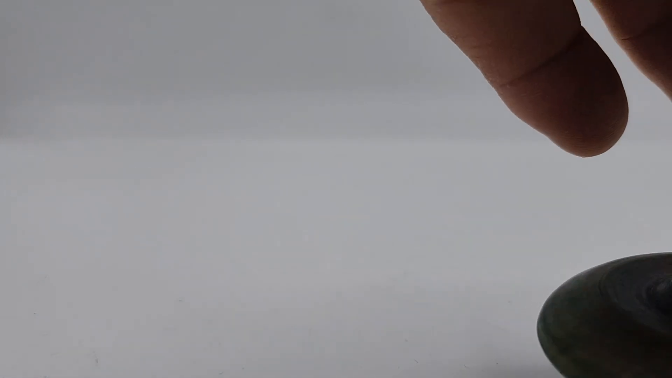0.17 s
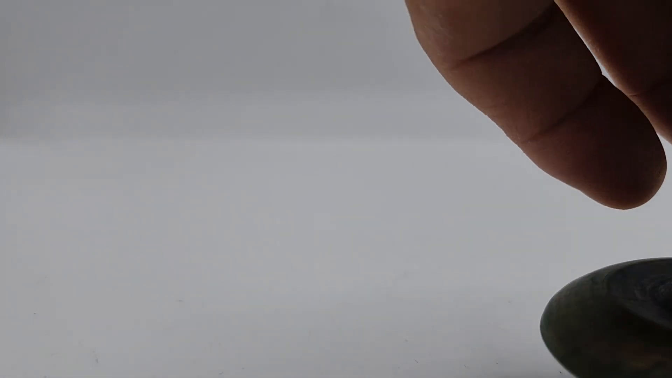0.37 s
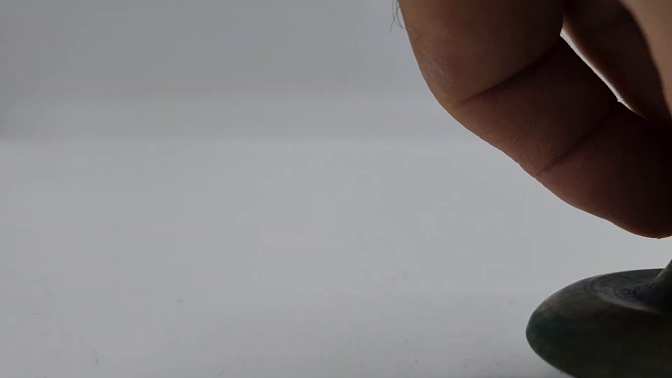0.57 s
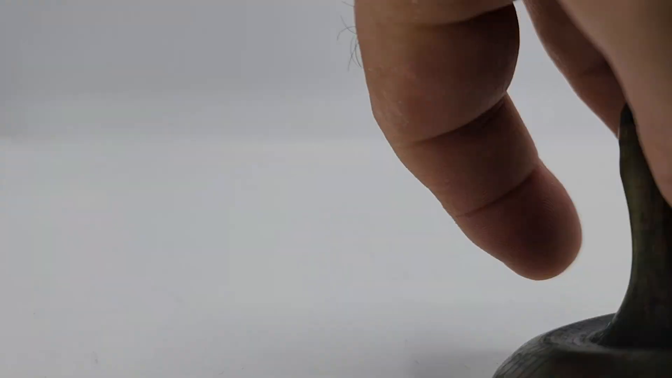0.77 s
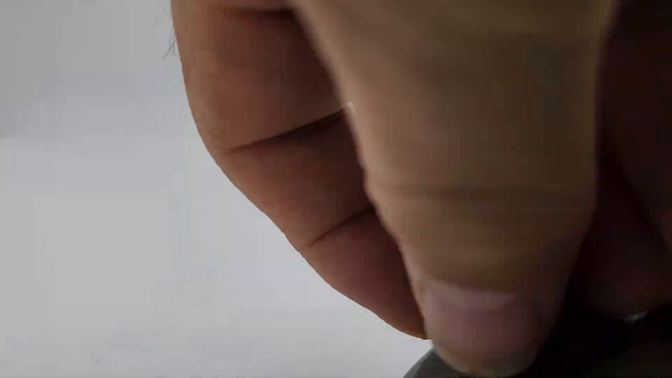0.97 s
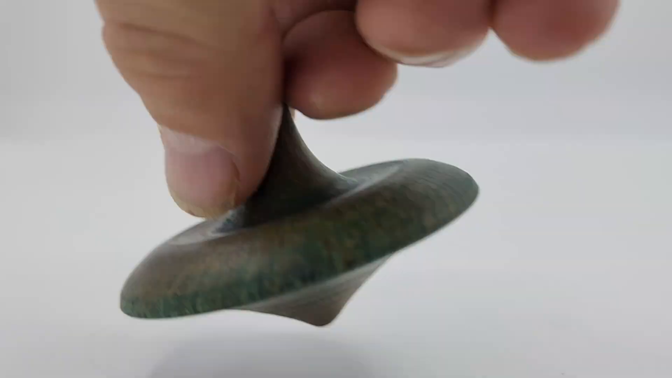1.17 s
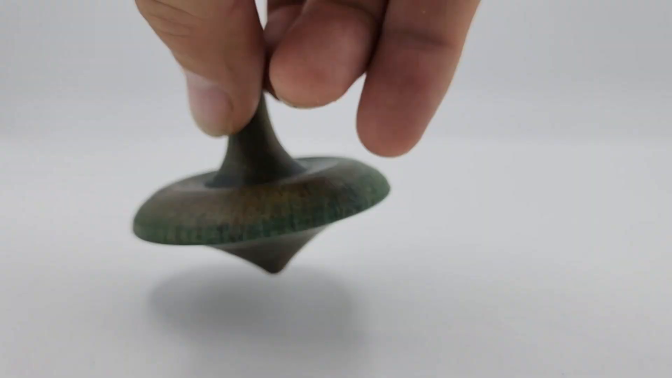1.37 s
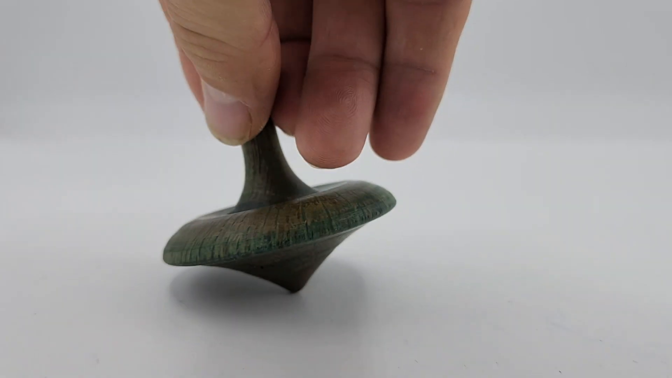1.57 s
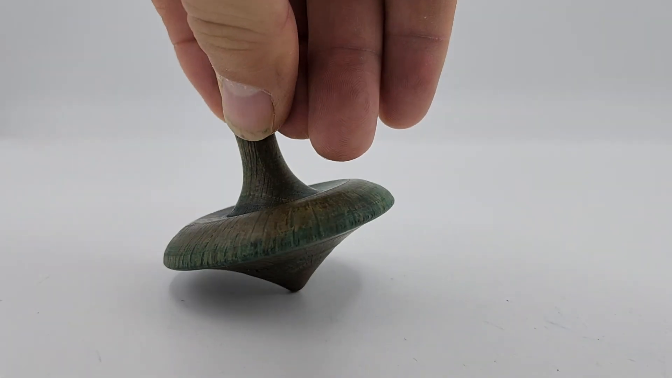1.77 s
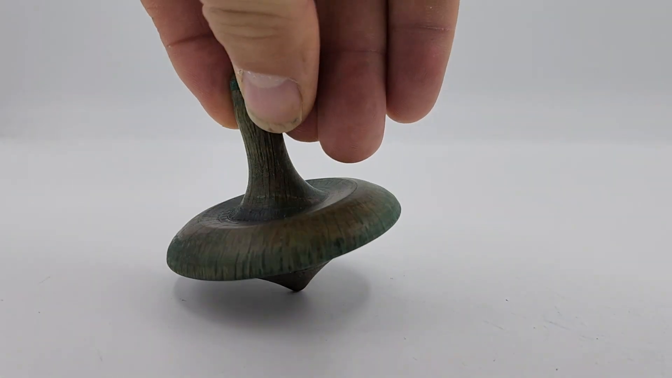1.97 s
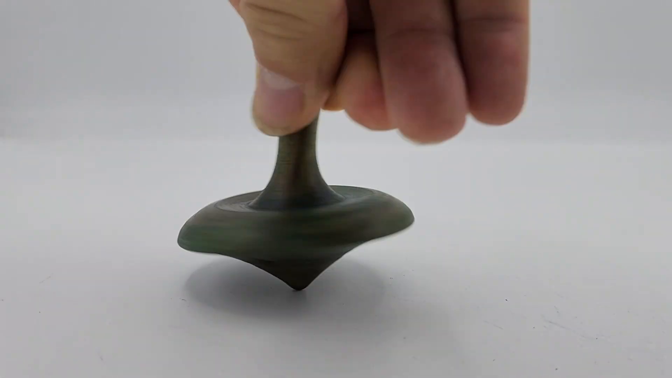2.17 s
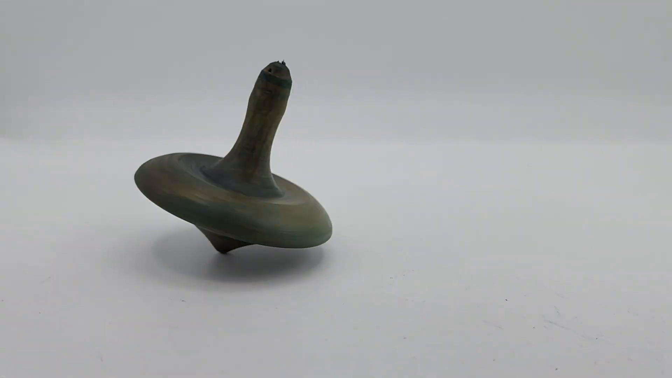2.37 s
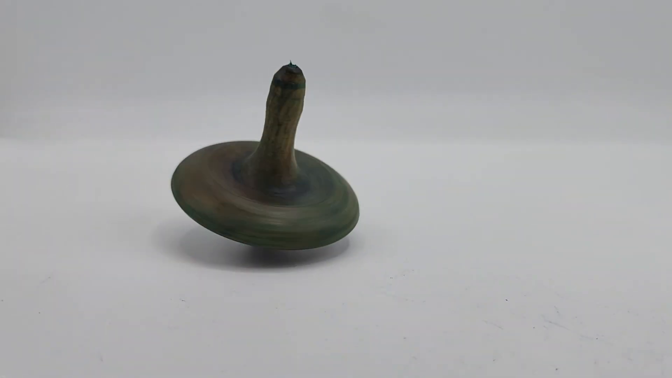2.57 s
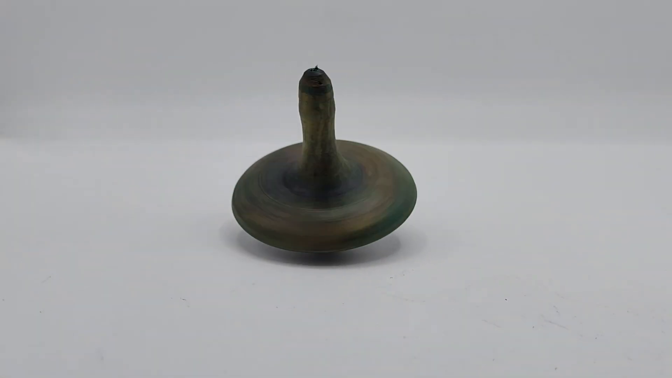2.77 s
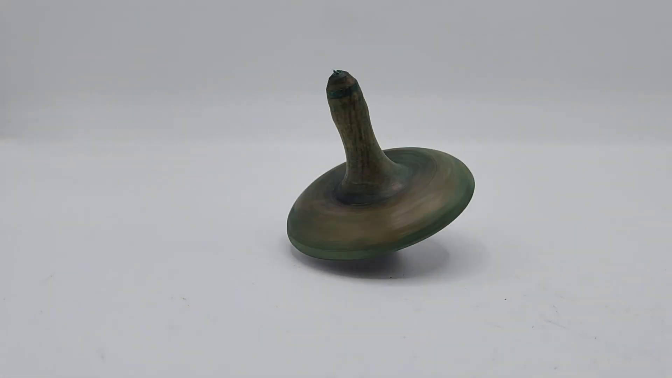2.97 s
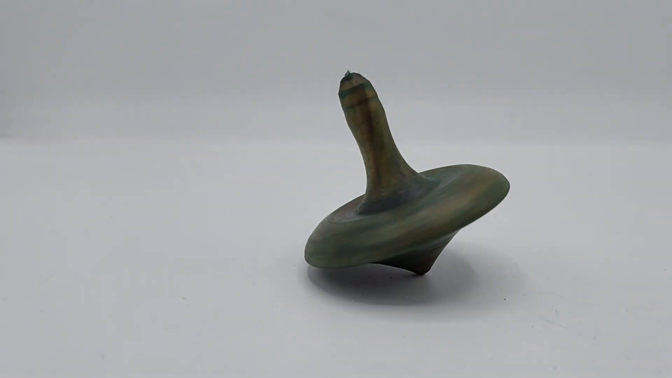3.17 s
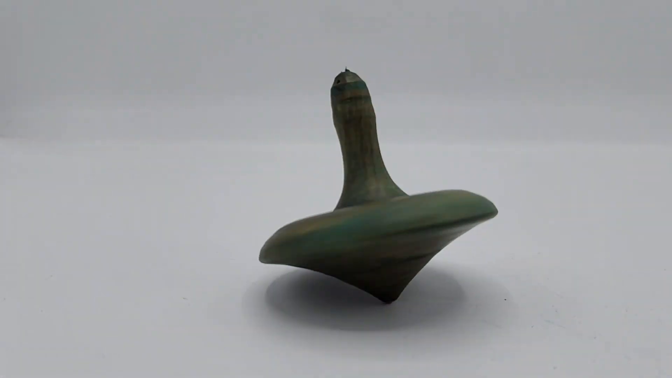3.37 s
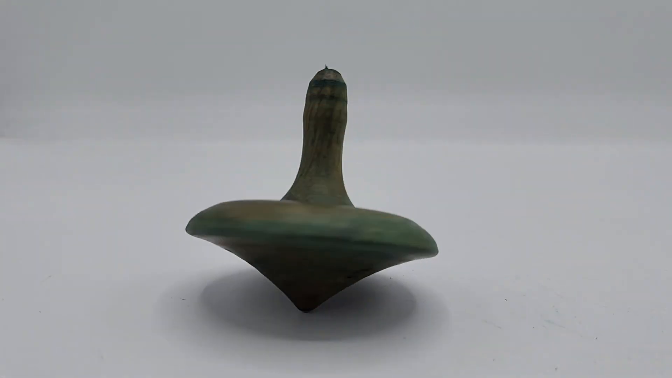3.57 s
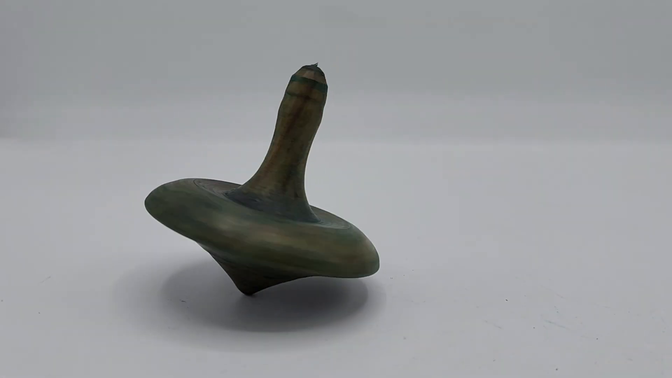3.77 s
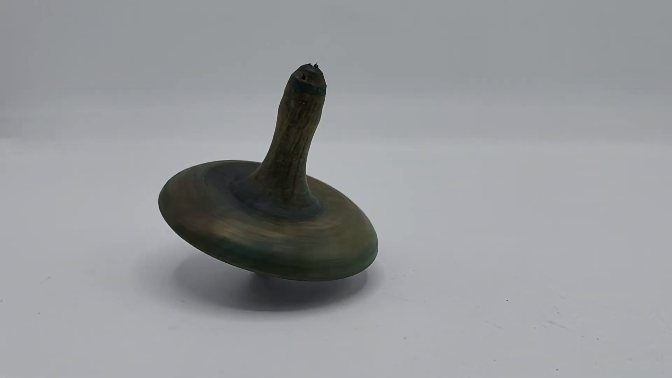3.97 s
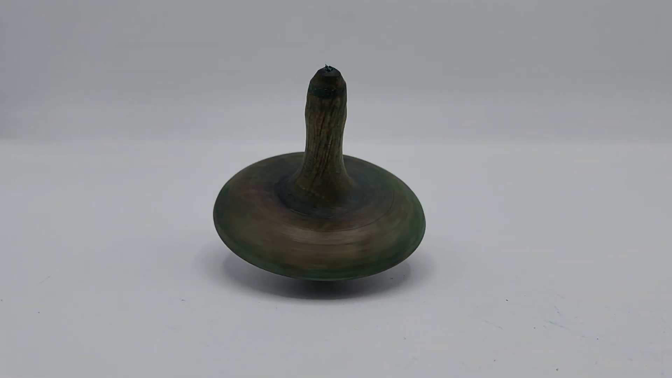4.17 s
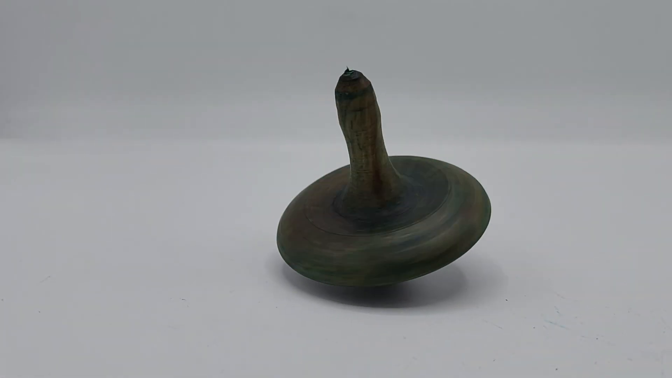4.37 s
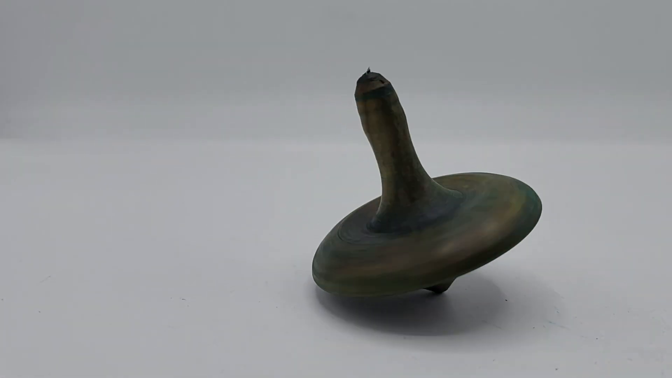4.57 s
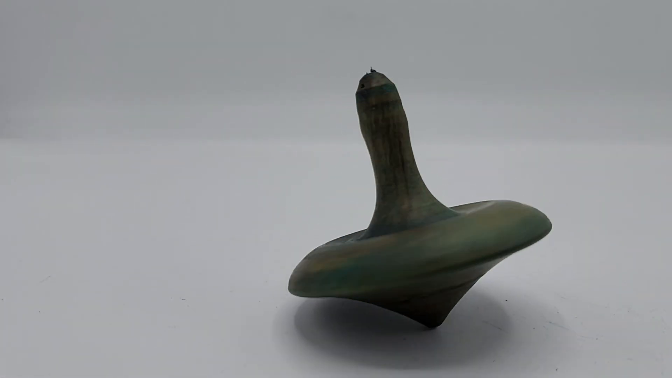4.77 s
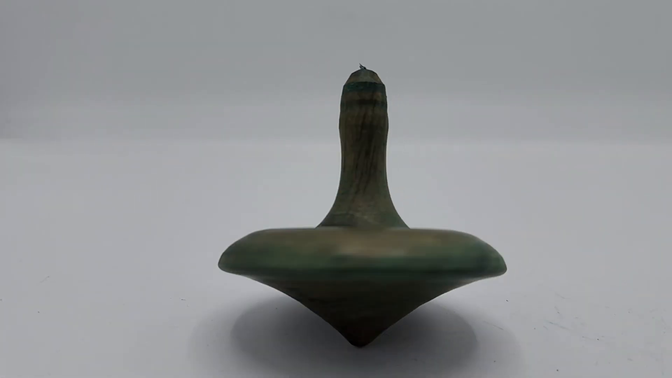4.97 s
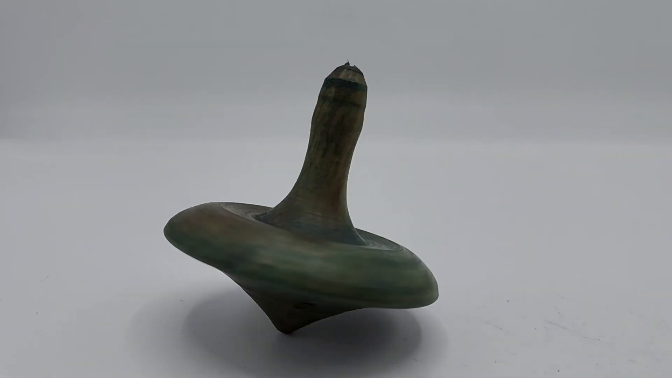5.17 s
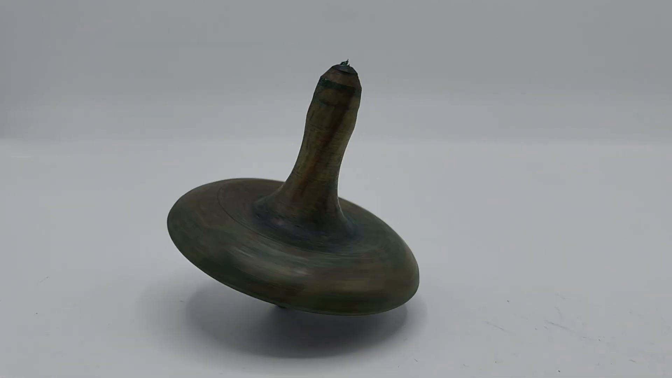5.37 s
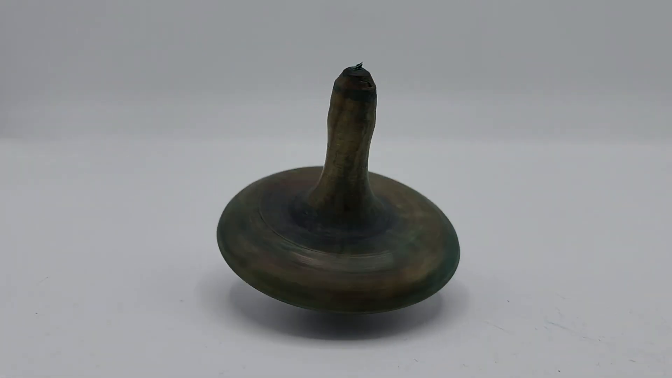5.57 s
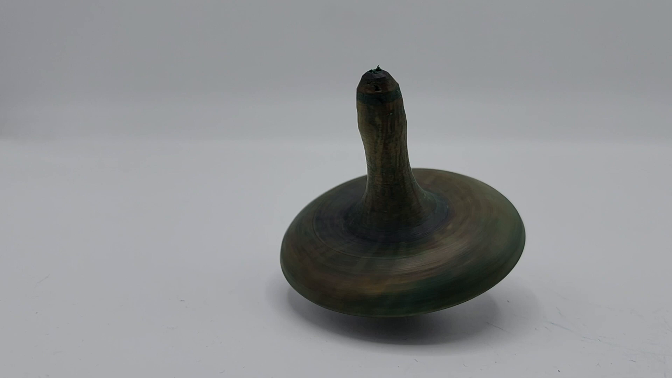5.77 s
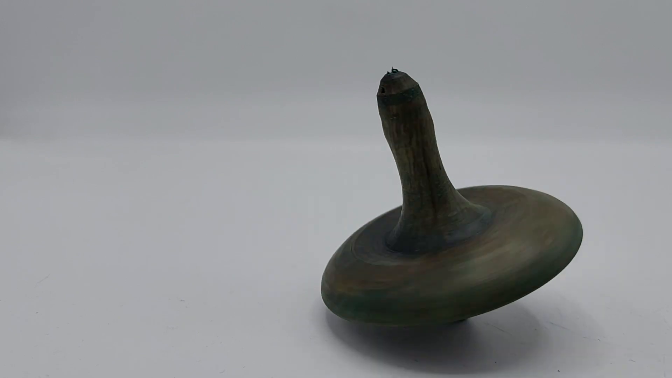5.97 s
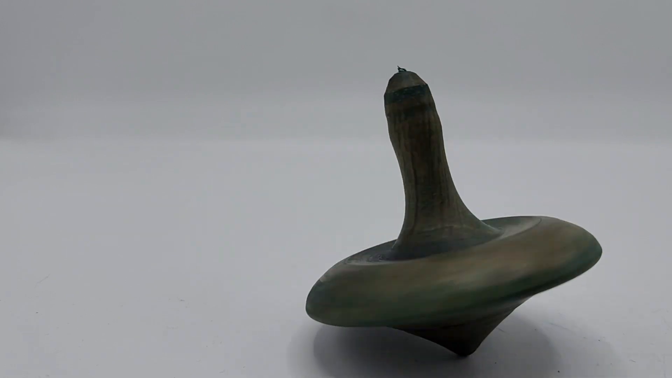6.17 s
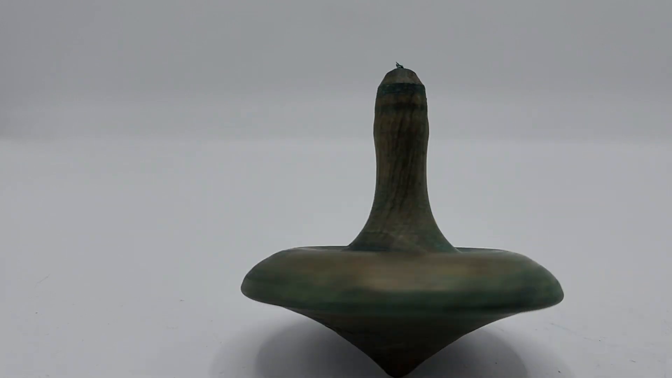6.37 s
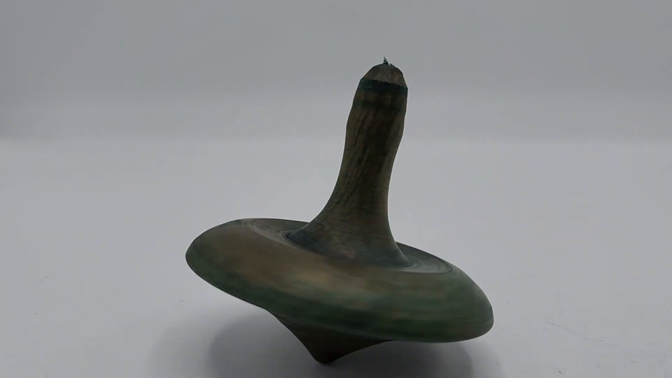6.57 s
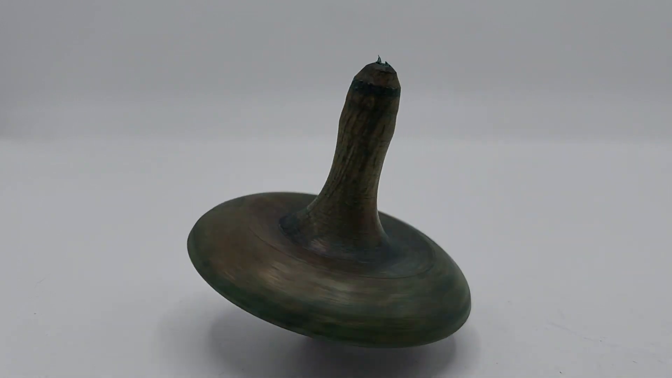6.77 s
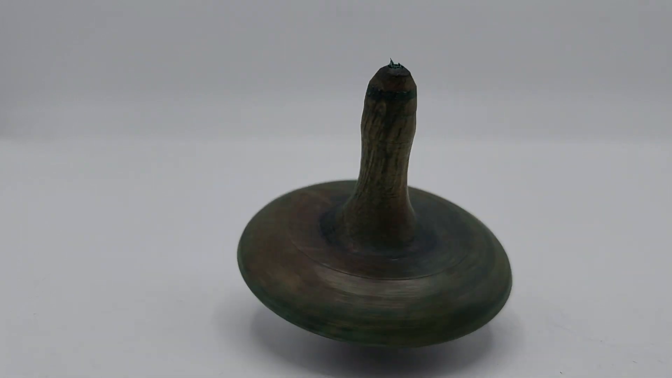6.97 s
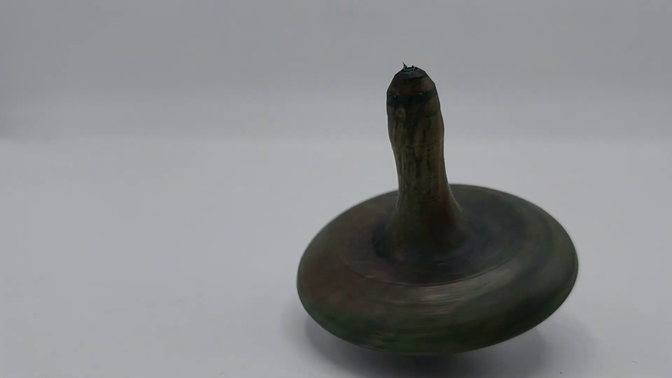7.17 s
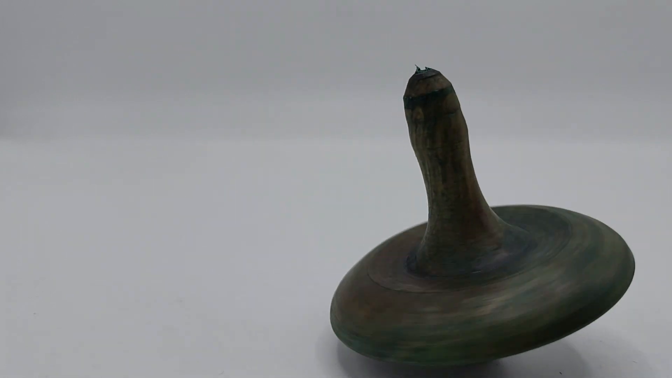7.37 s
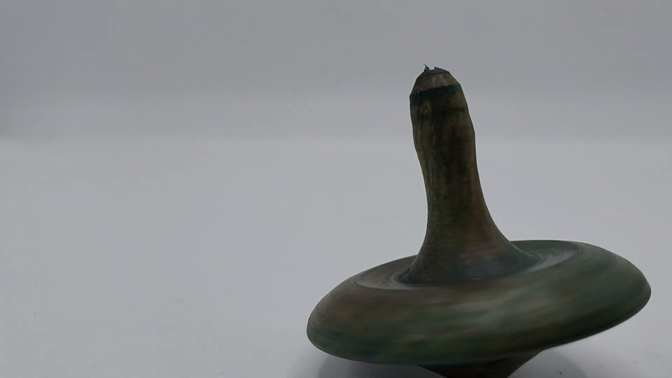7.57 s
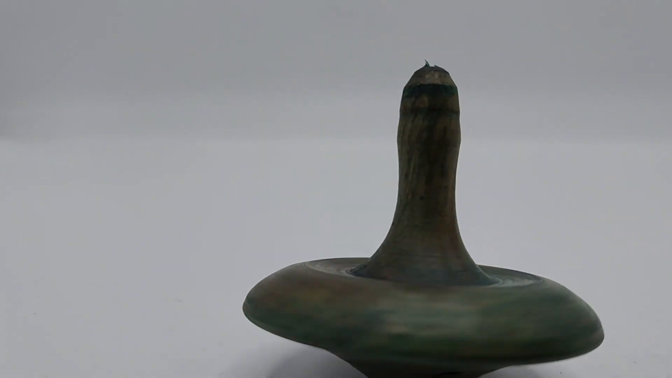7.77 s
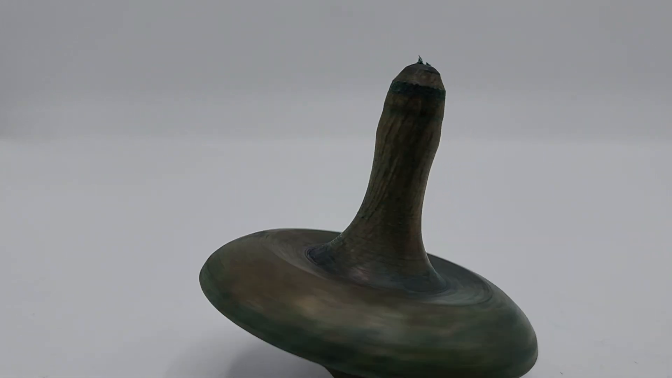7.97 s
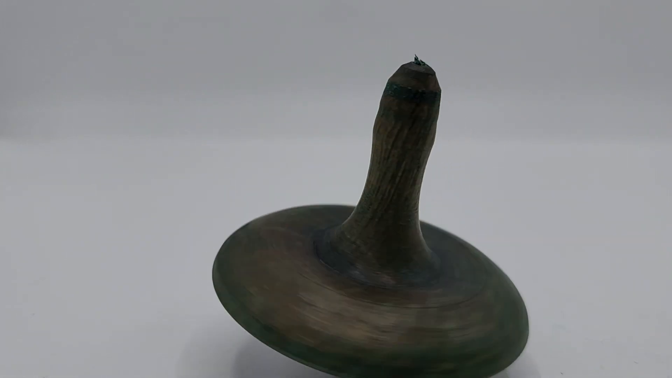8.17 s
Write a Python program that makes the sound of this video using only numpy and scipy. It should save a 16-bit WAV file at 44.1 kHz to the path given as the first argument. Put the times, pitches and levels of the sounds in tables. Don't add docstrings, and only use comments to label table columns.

```python
import sys
import numpy as np
from scipy import signal
from scipy.fft import rfft, irfft
from scipy.io import wavfile
from scipy.ndimage import uniform_filter1d

SR = 44100
rng = np.random.default_rng(int(sys.argv[2]) if len(sys.argv) > 2 else 0)


def waveform_to_disk(signal):
    frames = np.transpose(np.atleast_2d(signal))
    scaled = np.clip(frames, -1, 1) * 32767
    samples = np.round(scaled).astype(np.int16)
    wavfile.write(sys.argv[1], SR, samples)


def volts_from_decibels(level):
    exponent = np.asarray(level, float) / 20
    return 10 ** exponent


N = 362943
T = np.arange(N) / SR

# frequency in Hz, density in dB per Hz.
ROOM = [(15, -39), (25, -4), (64, -7.5), (130, -1.5), (161, -6), (285, -34), (405, -22.5), (503, -33.5),
        (1520, -37), (2160, -44), (7110, -44.5), (7710, -35.5), (9070, -65.5), (12500, -50.5),
        (16000, -66.5)]
# frequency in Hz, likeness from 0 to 1.
ROOM_ALIKE = [(60, 0.92), (300, 0.3), (1400, 0), (4000, 0.02)]

# start in seconds, level in dB, centre in Hz, t60 in seconds.
TICKS = [
    (.579, -36, 7700, .03),
    (0.599, -37.5, 10000, 0.075),
    (0.758, -28.5, 6050, 0.012),
    (.758, -38.5, 1540, 0.028),
    (1.024, -65.5, 949, .08),
    (1.366, -36.5, 1820, .06),
    (2.146, -38, 2513, 0.068),
    (2.188, -39, 2390, 0.051),
    (3.111, -68, 1480, 0.024),
    (3.157, -54.5, 1560, 0.088),
]
# start in seconds, level in dB, centre in Hz.
SPECKS = [(1.6287, -59.5, 1080), (4.8868, -66.5, 1220), (4.9536, -63.5, 1240), (5.1334, -71.5, 1280),
          (5.4625, -67, 1140), (5.5494, -68, 1110), (5.7304, -67, 1000), (5.7638, -64, 1050),
          (6.2871, -66.5, 1220), (6.4238, -69, 1220), (6.4704, -71.5, 1240), (7.2833, -69, 1020)]
# start in seconds, level in
# dB, frequency in Hz, length in seconds.
SQUEAKS = [(0.446, -58, 5400, 0.074), (0.497, -57.5, 5500, 0.059), (0.686, -39, 5510, 0.037),
           (1.022, -64, 5750, 0.079), (1.418, -76, 1712, 0.46), (2.124, -26, 5170, 0.012),
           (2.132, -34.5, 5300, 0.021), (4.176, -73.5, 3150, 0.022), (4.37, -77.5, 3440, .012),
           (4.5, -72, 2810, 0.014), (4.629, -72, 3110, 0.017), (4.879, -71, 3180, .018),
           (4.244, -74, 3050, .015), (5.55, -75.5, 3094, .015), (5.819, -75, 2760, 0.016)]

# start of full strength in seconds, rise in seconds per 30 dB,
# hold in seconds, fall in seconds per 30 dB, level in dB.
SKIN = [
    (.476, -0.3, 0.04, 0.6, -80),
    (.68, -0.08, 0.064, 0.45, -54.5),
    (1.035, -0.1, 0.014, 0.1, -67.5),
    (1.512, -0.8, .03, -0.32, -69.5),
    (1.63, 0.04, 0.028, 0.06, -58),
    (1.375, 0.22, .005, 0.13, -60),
]
WOOD = [
    (.608, 0.034, 0.041, 0.12, -44.5),
    (.757, .005, 0.043, 0.12, -51),
]
SLEEVE = [
    (3.46, 0.048, 0.056, 0.067, -73),
    (3.6, 0.16, 0.24, .07, -69.5),
]
FLICK = [
    (2.126, .035, .02, .12, -46),
    (2.19, .03, 0.012, 0.035, -56.5),
]
FELT = [
    (.86, .1, 0.065, 0.095, -65),
    (1.52, 0.12, 0.023, 0.067, -85),
]
CLOTH = [
    (1.105, 0.12, 0.23, 0.11, -86.5),
    (2.82, 0.18, .04, .15, -78),
    (2.9, 0.069, 0.023, 0.3, -83.5),
    (3.27, .1, 0.24, .1, -88),
    (3.515, 0.078, .005, 0.1, -62.5),
    (3.87, 0.059, .02, 0.54, -85.5),
    (4.71, 0.22, 0.031, 0.41, -84.5),
]
# strokes as above, then levels in dB at 4.4-5.9, 1.5-3.8, 6-8, 8.5-15, 0.5-1.3 kHz.
RUBS = [
    (SKIN, (-0.4, -17, -9.5, -12, -25)),
    (WOOD, (1.7, -4, 1, 8.5, -16)),
    (FELT, (1, 6.5, -1, -18, 13)),
    (CLOTH, (0.9, -1, 4.5, -4.5, -14)),
    (SLEEVE, (0.3, 0.033, 4.9, 1.4, 0.72)),
    (FLICK, (-1, -3, -3.5, 2, -10)),
]
# time in seconds, delay of the left port in samples.
RUB_LAG = [(.8, 19), (1.4, -14), (2.1, -32)]

# start in seconds, hold in seconds, fall in seconds per 30 dB,
# middle family level in dB, high family level in dB.
DRAG = [
    (0.565, .13, 0.09, -29, -46.5),
    (0.742, 0.058, 0.03, -24, -41),
    (0.837, 0.11, -0.1435, -38.5, -43),
    (0.952, 0.0078, 1.4, -59, -76),
    (1.415, 0.0085, 0.2, -44, -62.5),
    (1.463, 0.018, 1, -46, -66),
    (1.809, 0.0088, -0.83, -37, -69),
    (1.887, .01, -1.2, -47, -77),
    (2.199, 0.003, 0.21, -35, -52.5),
    (2.256, 0.017, -0.14, -57, -73),
]
# start in seconds, middle, held and high family levels in dB, contact in milliseconds.
KNOCKS = [(0.541, -39.5, -32, -45, 7.1), (0.577, -11, -24, -20, 8.2), (0.584, -21, -25, -20.5, 9.6),
          (0.63, -30, -34.5, -28.5, 2.5), (0.636, -17.5, -53, -48, 5.1), (0.653, -27.5, -54, -23.5, 5.4),
          (0.691, -22.5, -30, -33, 3.6), (0.7, -27.5, -42, -42.5, 2), (0.738, -25, -24, -32, 2.3),
          (0.757, -14, -32, -7.5, 3.15), (0.763, -22.5, -23.5, -20, 5.7), (0.828, -30, -43, -58, 2.8),
          (0.948, -28.5, -44.5, -53, 4.45), (1.371, -10, -36, -22.5, 1.06), (1.408, -31, -47, -60, 2.7),
          (1.485, -36, -46, -59, 1.9), (1.618, -37.5, -44, -55, 2.7), (1.797, -28.5, -38.5, -51, 2.8),
          (1.884, -39, -51.5, -64.5, 5.2), (2.097, -28.5, -33, -46, 4.9), (2.121, -6, -7, -29.5, 5.8),
          (2.146, -11, -14.5, -26.5, 4.17), (2.192, -16, -38, -32.5, 1.26), (2.217, -22, -28.5, -55, 9.7)]

# frequency in Hz, level in dB, t60 in seconds, sign of the first swing.
BOARD_LOW = [(77.8, -1, 0.3, 0.97), (86.3, -4.5, 0.38, 0.97), (47.4, -7, 0.96, 0.99)]
BOARD_MID = [(120.3, 1, .12, 0.92), (161.2, 0.5, .09, 0.93), (187.1, -9, .09, -0.88)]
BOARD_HIGH = [(345.7, 1, 0.078, 0.65), (390, -9, .09, 0.31), (466.8, -9.5, 0.05, -1),
              (632.7, -10.5, 0.034, 0.92), (678, -18.5, 0.087, 0.88), (902.7, -18, 0.053, -0.77),
              (978, -17, 0.031, 0.85), (1230, -19.5, 0.042, 1)]
BOARD_HELD = [(107.15, -3, 0.28, 0.93), (82.7, -6.5, 0.14, 0.83)]
BOARD_PAN_DB = (.6, 2.2, 5.)
# frequency in Hz, level in dB, t60 in seconds, signed weight.
TOP_MODES = [(887, -7, 0.091, 0.65), (1079, -4, 0.12, -0.5), (1174, -1.5, 0.046, 0.8),
             (1420, -8.5, 0.017, -2), (2110, -11, .03, 0.86), (2870, -2, 0.011, 0.3), (3150, -16, 0.022, 1),
             (3630, -7.5, 0.019, -0.5)]
# time in seconds, hop level in dB, lobe level in dB, grit level in dB.
ROLL = [(2.32, -78.5, -66.5, -72), (2.499, -50, -61, -71), (2.58, -36, -38.5, -66.5),
        (2.719, -33, -36.5, -56), (3.051, -43.5, -36.5, -56.5), (3.5, -42.5, -43.5, -61.5),
        (3.751, -60.5, -70, -67.5), (4.05, -32.5, -42, -66), (4.199, -33.5, -43.5, -60),
        (4.45, -43.5, -39.5, -61), (4.95, -42.5, -53, -61), (5.22, -46.5, -63.5, -75.5),
        (5.5, -37, -38, -64.5), (5.95, -39.5, -42, -65), (6.249, -39.5, -42, -65), (6.7, -46, -60, -69.5),
        (7.502, -40, -49, -66.5), (8.23, -55, -53.5, -74.5)]

LANDS_S, SPIN_S, SPIN_HZ, SPIN_HZ_PER_S = 2.32, 2.4985, 16.4629, -.4708
WOBBLE_HZ, WOBBLE_HZ_PER_S, WOBBLE_START, WOBBLE_TURNS = .6375, .0161, .757, .0393
LOW_DB, LOW_DB_PER_S = -3.3, 2
BOUNCE_DB, BOUNCE_DB_PER_S, BOUNCE_MS, BOUNCE_MS_PER_S = -2.5, 0.56, 12.84, 0.44
RATTLE_DB, RATTLE_DB_PER_S = -1.5, -2.5
RATTLE_WOBBLE_DB, RATTLE_LAG_TURNS = 3, .22
AIR_DB, AIR_DB_PER_S, AIR_FOLLOWS = -70.5, -1.5, 0.39


def band(x, lo_hz, hi_hz, order=2):
    return signal.sosfilt(signal.butter(order, [lo_hz, hi_hz], "band", fs=SR, output="sos"), x)


def highpass(x, hz):
    return signal.sosfilt(signal.butter(2, hz, "high", fs=SR, output="sos"), x)


def unit(x):
    return x / np.sqrt(np.mean(x ** 2))


def walk(rate):
    hold = int(SR / rate)
    steps = np.repeat(rng.standard_normal(N // hold + 1), hold)
    return 1.3 * uniform_filter1d(uniform_filter1d(steps, hold), hold)[:N]


def pan(x, db):
    return x * volts_from_decibels(np.array([[.5], [-.5]]) * db)


def over_log_hz(hz, table):
    points_hz, values = np.transpose(table)
    return np.interp(np.log(hz), np.log(points_hz), values)


def ring(force, modes):
    t = T[:SR // 2]
    response = np.zeros(len(t))
    for hz, db, t60, sign in modes:
        response += sign * volts_from_decibels(db) * np.sin(2 * np.pi * hz * t) * 1000. ** (-t / t60)
    response /= np.abs(response).max()
    return signal.fftconvolve(force, response[None], axes=1)[:, :N]


def add(force, s, event):
    i = int(s * SR)
    n = min(event.shape[-1], N - i)
    if n > 0:
        force[..., i:i + n] += event[..., :n]


def push(ms):
    w = np.hanning(max(int(ms * SR / 1000), 4))
    return w / w.sum()


def swell(rows):
    gain = np.zeros(N)
    for s, rise, hold, fall, db in rows:
        rise, fall = max(rise, 1e-3), max(fall, 1e-3)
        span = slice(max(int((s - 2 * rise) * SR), 0), int((s + hold + 2 * fall) * SR))
        late = T[span] - s
        below = np.maximum(-late / rise, (late - hold) / fall).clip(0)
        gain[span] += volts_from_decibels(db - 30 * below)
    return gain


def room():
    hz = np.maximum(np.fft.rfftfreq(N, 1 / SR), 1)
    gain = volts_from_decibels(over_log_hz(hz, ROOM))
    alike = np.clip(over_log_hz(hz, ROOM_ALIKE), 0, 1)
    mid, side = rfft(rng.standard_normal((2, N)), axis=1) * gain
    spectrum = mid * np.sqrt(1 + alike) + np.array([[1], [-1]]) * side * np.sqrt(1 - alike)
    out = irfft(spectrum, N, axis=1)
    out = out / np.std(band(out.mean(axis=0), 195.8, 16000, order=4))
    hum = band(out, 25, 220)
    waver = volts_from_decibels(walk(5.6)) - 1
    return pan(volts_from_decibels(-73.5) * (out + hum * waver), 1.1)


def ticks():
    out, t = np.zeros((2, N)), T[:SR // 8]
    dust = [(s, db - 4, hz, .03) for s, db, hz in SPECKS]
    for s, db, hz, t60 in TICKS + dust:
        noise = rng.standard_normal((3, len(t)))
        crack = unit(band(noise[:2] + noise[2], hz / 2.1, hz * 1.6))
        add(out, s, volts_from_decibels(db) * crack * 1000. ** (-t / t60))
    return out


def squeaks():
    out = np.zeros((2, N))
    for s, db, hz, length_s in SQUEAKS:
        n = int(length_s * SR)
        envelope = np.hanning(n) * volts_from_decibels(3. * walk(50)[:n])
        phase = np.cumsum(rng.standard_normal((2, n)), axis=1) * .12
        add(out, s, volts_from_decibels(db) * envelope * np.sin(2 * np.pi * hz * T[:n] + phase))
    return out


def rubbing():
    out = np.zeros((2, N))
    edges_hz = ((4200, 6100), (1200, 4300), (5900, 8400), (8200, 15700), (450, 1300))
    signs = (1, -1, -1, 1, 1)
    for rows, colour_db in RUBS:
        gain = swell(rows)
        i, j = np.flatnonzero(gain)[[0, -1]]
        n = j - i
        lag = np.interp(T[i:j], *np.transpose(RUB_LAG)).astype(int)
        noise = rng.standard_normal((3, n)) * volts_from_decibels(1.6 * rng.exponential(size=n))
        left, right = noise[2, np.arange(n) - lag - 40], np.roll(noise[2], 40)
        noise = 1.2 * noise[:2] + np.array([left, right])
        sparse = rng.random(600) < .05
        echoes = rng.standard_normal(600) * sparse * np.exp(-np.arange(600) / 300.)
        echoes[0] = 8
        noise = signal.oaconvolve(noise, echoes[None], axes=1)[:, :n]
        for sign, db, edge in zip(signs, colour_db, edges_hz):
            out[:, i:j] += gain[i:j] * sign * volts_from_decibels(db) * unit(band(noise, *edge))
    return out * volts_from_decibels(0.5 + 1.8 * walk(120))


def drag():
    grains = rng.standard_normal((2, N)) * volts_from_decibels(4.4 * rng.exponential(size=N) + 1.2 * walk(40))
    rise_s = 0.025
    mid_gain = swell([(s, rise_s, hold, fall, mid_db) for s, hold, fall, mid_db, high_db in DRAG])
    high_gain = swell([(s, rise_s, hold, fall, high_db) for s, hold, fall, mid_db, high_db in DRAG])
    force = np.zeros((4, 2, N))
    force[1] = pan(mid_gain * volts_from_decibels(-31) * unit(grains[0]), 3.8)
    force[2] = pan(high_gain * volts_from_decibels(-21) * unit(grains[1]), 4.)
    return force


def knocks():
    force = np.zeros((4, N))
    for s, mid_db, held_db, high_db, ms in KNOCKS:
        add(force[3], s, volts_from_decibels(held_db) * push(1.24 * ms))
        add(force[1], s, volts_from_decibels(mid_db + 0.5) * push(ms))
        add(force[2], s, volts_from_decibels(high_db) * push(0.3 * ms))
    return np.array([pan(f, db) for f, db in zip(force, (0, 3.2, 4.5, 2.4))])


def top():
    u = T - SPIN_S
    wobble = 2 * np.pi * (WOBBLE_HZ * u + WOBBLE_HZ_PER_S * u ** 2 / 2 + WOBBLE_START)
    turn = SPIN_HZ * u + SPIN_HZ_PER_S * u ** 2 / 2 + WOBBLE_TURNS * np.sin(wobble)
    s, *columns = np.transpose(ROLL)
    hop_db, lobes_db, grit_db = (np.interp(T, s, c, left=-120) for c in columns)
    grit_db += 1.3 * walk(9)
    down_db = np.where(T > LANDS_S, 0, -120)
    air_db = down_db + AIR_DB + AIR_DB_PER_S * u + AIR_FOLLOWS * (grit_db + 62.5)
    swing_db = RATTLE_WOBBLE_DB * np.cos(wobble - 2 * np.pi * RATTLE_LAG_TURNS)
    rattle_db = np.minimum(RATTLE_DB + RATTLE_DB_PER_S * u + swing_db, 0)

    new_turn = np.diff(np.floor(turn)) > 0
    hops = np.flatnonzero(new_turn & (T[1:] > LANDS_S))
    chance = rng.standard_normal((len(hops), 11))
    force, landing = np.zeros((3, N)), np.zeros(N)
    for k, i in enumerate(hops):
        delay_s = (BOUNCE_MS + BOUNCE_MS_PER_S * u[i] + 0.16 * chance[k, 0]) / 1000
        first_db = BOUNCE_DB + BOUNCE_DB_PER_S * u[i]
        low_db = hop_db[i] + LOW_DB + LOW_DB_PER_S * u[i]
        for b, luck in enumerate(chance[k, 1:].reshape(5, 2)):
            when = T[i] + b * delay_s
            db = min(b, 1) * first_db + max(b - 1, 0) * rattle_db[i]
            add(force[0], when, volts_from_decibels(low_db + db) * push(2.7))
            add(force[1], when - .0015, volts_from_decibels(hop_db[i] + db + 10.5 + 1.9 * luck[0]) * push(5.14))
            add(force[2], when, volts_from_decibels(grit_db[i] + db - 8.0 + 1.8 * luck[1]) * push(0.28))
            add(landing, when, volts_from_decibels(2.5 * luck[1]) * np.hanning(400))
    force[0] += volts_from_decibels(lobes_db - 51.0) * np.sin(5 * 2 * np.pi * turn + 2.12)

    grit = unit(rng.standard_normal((4, N)) * volts_from_decibels(2.2 * rng.exponential(size=N)))
    grit = grit * (.75 + 1.1 * landing)
    force = np.array([pan(f, db) for f, db in zip(force, BOARD_PAN_DB)])
    force[2] += pan((grit[:2] + .8 * grit[0]) * volts_from_decibels(grit_db - 26 + 1.5 * walk(30)), 4.)
    force[1] += pan(grit[1] * volts_from_decibels(hop_db - 44), 2.5)
    force[1] = band(force[1], 4, 205.5, order=3)
    force[2] = band(force[2], 280, 3700, order=3)
    crushed = volts_from_decibels(4.5 * rng.exponential(size=N).clip(0, 4) * (rng.random(N) < .015))
    air = ring(grit[2:] * crushed * volts_from_decibels(air_db - 22.0 + 3.4 * walk(33)), TOP_MODES)
    return -force, pan(air, 2.7)


def scene():
    rolling, air = top()
    force = np.concatenate([rolling, np.zeros((1, 2, N))]) + knocks() + drag()
    families = (BOARD_LOW, BOARD_MID, BOARD_HIGH, BOARD_HELD)
    board = sum(ring(f, modes) for f, modes in zip(force, families))
    board = highpass(board, 68)
    board[1] = np.roll(board[1], 5)
    return board + air + rubbing() + ticks() + squeaks() + room()


def band_limit(x):
    return signal.sosfilt(signal.butter(12, 16660, fs=SR, output="sos"), x)


def record(dry):
    x = highpass(dry, 38)
    x = signal.sosfilt(signal.ellip(8, .3, 50, 15800, fs=SR, output="sos"), x)
    return band_limit(x)


dry = scene()
out = record(dry)
waveform_to_disk(out)
```